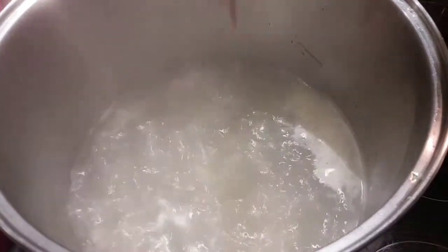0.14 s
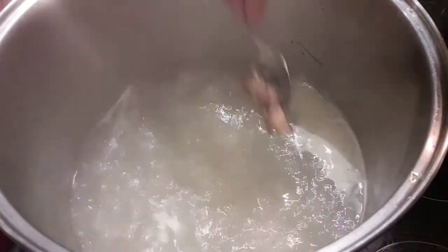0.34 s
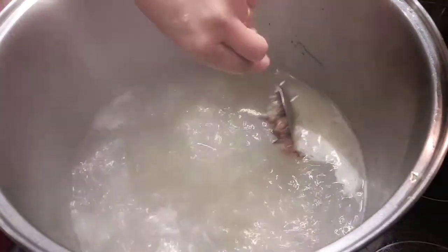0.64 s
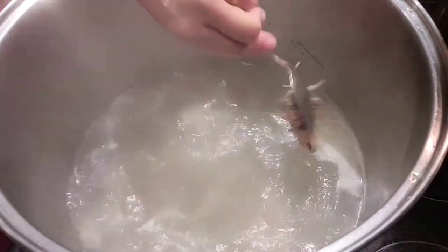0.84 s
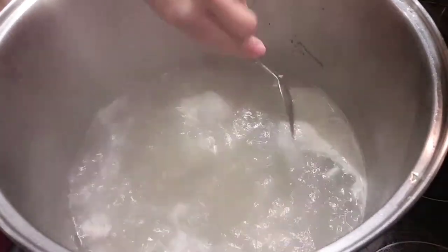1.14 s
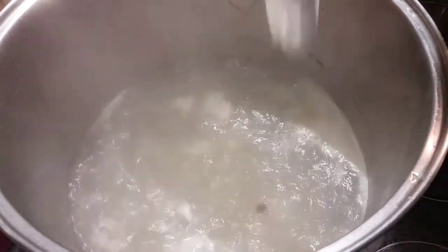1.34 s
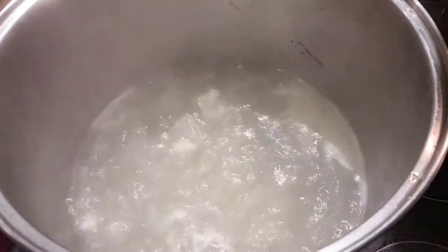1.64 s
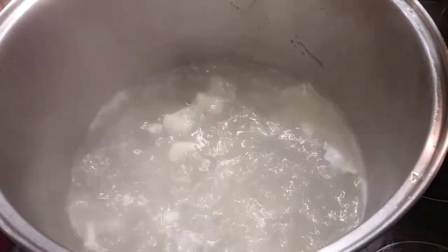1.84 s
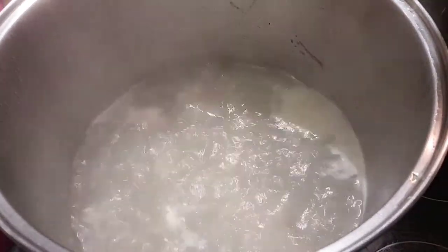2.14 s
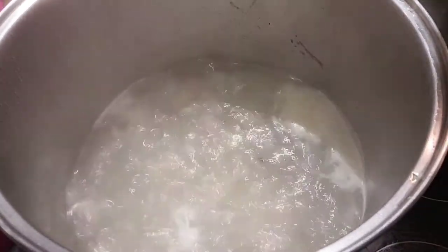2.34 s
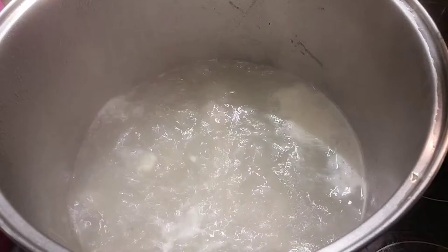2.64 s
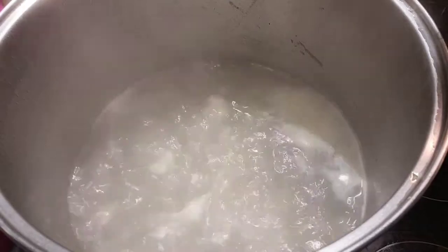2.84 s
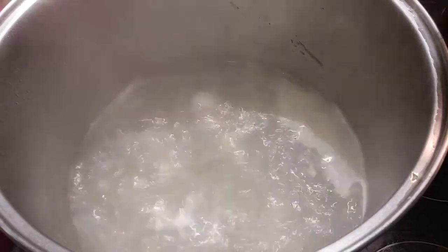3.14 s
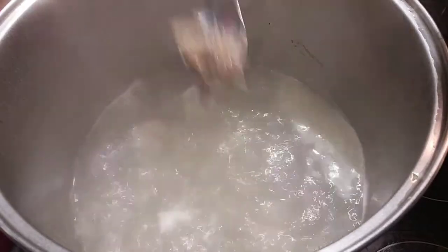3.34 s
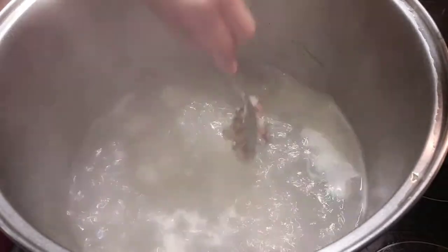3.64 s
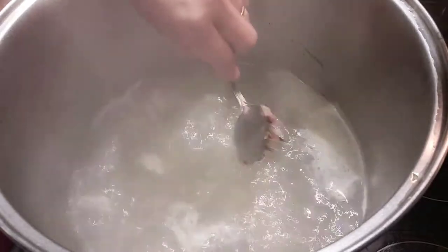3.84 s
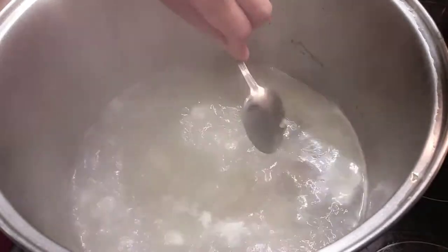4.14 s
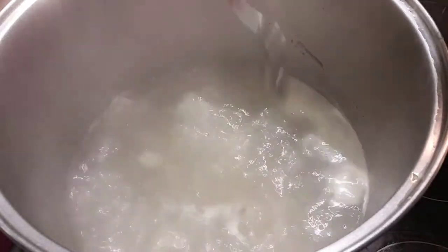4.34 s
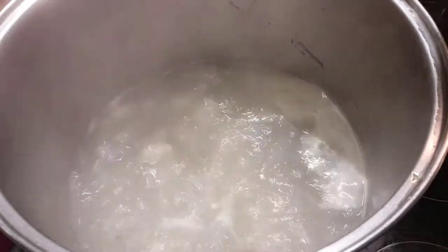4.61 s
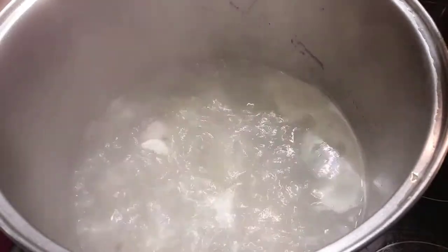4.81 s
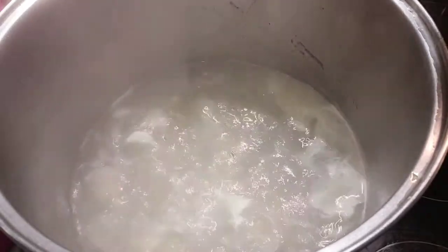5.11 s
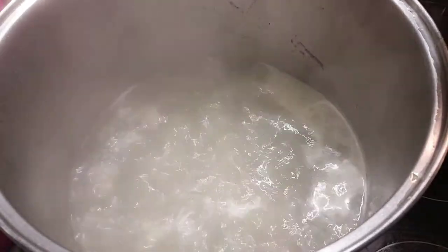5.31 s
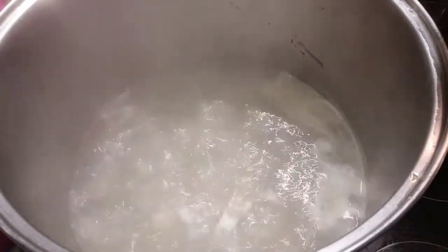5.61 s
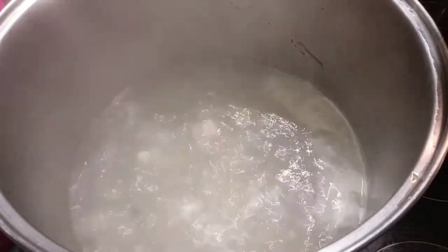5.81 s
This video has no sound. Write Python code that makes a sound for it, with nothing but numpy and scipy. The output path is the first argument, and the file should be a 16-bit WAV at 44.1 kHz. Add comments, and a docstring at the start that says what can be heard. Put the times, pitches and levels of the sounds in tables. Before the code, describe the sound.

A large open steel pot boils hard on a kitchen stove, heard from close above. Hollow, low-mid glugs tumble irregularly over steady simmer, airy pot hum, fizz and tiny bright pops. A spoon clinks sharply around 1.3 seconds with a small splash; duller knocks follow, the strongest near 4.4 seconds with more splashing. Low stove hum lies underneath. Only the right channel carries the scene; the left has faint hiss.

```python
"""A large open steel pot at a rolling boil on an electric stove, heard from close above.
Swelling, rising tones make the steam bubbles glug, fizz and pop; air in the pot hums along and the stove hums low.
Noise makes the simmer, rumble and splashes; ringing tones make a spoon clink and tap a dish nearby.
The microphone feeds only the right input; the open left input carries circuit hiss and a thin whine.
Levels in the scene are those before the input gain and the echo of the kitchen."""
import sys
import numpy as np
from scipy import signal
from scipy.io import wavfile

SR = 44100
rng = np.random.default_rng(int(sys.argv[2]) if len(sys.argv) > 2 else 0)


def to_wav(sig):
    """Store sig (one row per channel, or 1-D mono) as 16-bit WAV at the path in sys.argv[1].

    Samples outside -1..1 are clipped; the rate is SR.
    """
    pcm = np.clip(np.atleast_2d(sig), -1, 1) * 32767
    pcm = np.round(pcm).astype(np.int16)
    wavfile.write(sys.argv[1], SR, pcm.T)  # frames by channels


N = 263277


def from_db(db):
    """Turn decibels into a plain factor."""
    return 10 ** (np.asarray(db) / 20)


def rms_one(x):
    """Scale a sound to an average strength (rms) of 1."""
    return x / np.sqrt(np.mean(x ** 2) + 1e-20)


def in_time(rows):
    """Draw straight lines between the rows of a table, one curve per column after the time."""
    s, *columns = np.transpose(rows)
    return [np.interp(np.arange(N) / SR, s, c) for c in columns]


def drift(rate):
    """Slow chance: noise at every 20th sample, smoothed twice; its rms is 1."""
    r = np.exp(-40 * np.pi * rate / SR)
    noise = rng.standard_normal(N // 20 + 4002)
    slow = signal.lfilter([1], [1, -2 * r, r * r], noise)[4000:]   # skip the filter's start
    return np.interp(np.arange(N) / 20, np.arange(len(slow)), rms_one(slow))


def resonance(x, hz, width_hz):
    """Ring at one pitch, as a hollow does, with gain 1 at the top."""
    r = np.exp(-np.pi * width_hz / SR)
    top = np.array([1, 0, -1]) * (1 - r * r) / 2
    return signal.lfilter(top, [1, -2 * r * np.cos(2 * np.pi * hz / SR), r * r], x)


def band(x, low_hz, high_hz):
    """Keep mainly what lies between two pitches."""
    sos = signal.butter(2, [low_hz, min(high_hz, .45 * SR)], "band", fs=SR, output="sos")
    return signal.sosfilt(sos, x)


def bubbles(s, db, hz, length_s, rise, size, order=2):
    """Each bubble swells, dies a little slower and climbs in pitch; s marks its loudest moment."""
    peak_s = length_s[:, None] * np.sqrt(order) / 2.4   # time from start to loudest moment
    t = np.arange(size) / SR
    u = t / peak_s
    # hz is the pitch at the loudest moment; the start of the swing is left to chance
    turns = hz[:, None] * (t + rise * peak_s * (u - 1) ** 2 / 2) + rng.random((len(s), 1))
    swell = (u * np.exp(1 - u)) ** order
    waves = from_db(db)[:, None] * swell * np.sin(2 * np.pi * turns)
    at = np.round((s[:, None] - peak_s) * SR).astype(int) + np.arange(size)
    at = np.where((at < 0) | (at > N), N, at)   # what falls outside goes to a spare place
    return np.bincount(at.ravel(), waves.ravel(), N + 1)[:N]


def swarm(per_s, low_hz, high_hz, cycles, spread_db, clump_db, clump_rate, size, rise=0.092):
    """Random bubbles in clumps, pitches spread between two limits; rms 1."""
    crowding = from_db(clump_db * np.clip(drift(clump_rate), -2, 1.6))
    s = np.flatnonzero(rng.random(N) < per_s * crowding / SR) / SR
    chance = rng.random((len(s), 2))
    hz = low_hz * (high_hz / low_hz) ** chance[:, 0]
    db = -spread_db * np.log(chance[:, 1] + 0.053)
    return rms_one(bubbles(s, db, hz, cycles / hz, rise, size))


def glugs(churn_db):
    """Large bubbles over a churn of lesser ones, all ringing the space inside the pot."""
    # large steam bubbles breaking, at the peak of the main voice: t/s, level/dB, f/Hz
    large_table = [(0.002, -23, 388), (0.0521, -19, 358), (0.078, -18.5, 328), (0.0927, -17.5, 356),
                   (0.214, -24, 360), (0.2569, -12.5, 347), (0.2675, -7.5, 330), (0.294, -19, 344),
                   (0.302, -22.5, 366), (0.3105, -22.0, 373), (0.379, -18.0, 323), (0.4395, -21.5, 410),
                   (0.5617, -21.5, 375), (0.596, -20, 386), (0.6898, -21, 376), (0.698, -20.5, 380),
                   (0.8035, -18, 326), (0.8106, -12, 356), (0.8231, -17.5, 360), (0.9795, -20.5, 376),
                   (1.0294, -20.5, 342), (1.0788, -20.5, 379), (1.0876, -21.5, 340), (1.1223, -16.5, 396),
                   (1.2008, -20.5, 386), (1.3362, -20.5, 430), (1.3495, -19, 370), (1.3697, -23, 358),
                   (1.4761, -25.5, 332), (1.5928, -16.5, 334), (1.7424, -16, 326), (1.7516, -15, 370),
                   (1.802, -20, 343), (1.826, -23, 357), (1.8377, -22.0, 364), (1.855, -7.5, 360),
                   (1.874, -9.5, 412), (1.9006, -24, 350), (1.9476, -24, 366), (1.9584, -19, 380),
                   (1.9734, -20, 390), (1.9839, -25, 370), (2.0572, -17, 402), (2.0688, -22.5, 385),
                   (2.191, -12.5, 353), (2.2107, -26, 331), (2.2198, -24, 350), (2.285, -20.0, 385),
                   (2.4766, -27, 363), (2.5256, -17.0, 316), (2.556, -20.5, 354), (2.6099, -21, 400),
                   (2.6518, -19.5, 365), (2.7319, -20, 317), (2.7406, -23, 365), (3.019, -20, 380),
                   (3.0279, -25, 367), (3.1118, -19, 360), (3.1817, -19, 348), (3.4307, -19.5, 376),
                   (3.4464, -16.5, 348), (3.5286, -13, 360), (3.5447, -16.0, 363), (3.5542, -20.5, 377),
                   (3.7641, -20.5, 360), (3.9698, -24, 380), (3.993, -23.5, 342), (4.0403, -19.5, 388),
                   (4.0863, -25.5, 347), (4.134, -23, 393), (4.1955, -19.0, 306), (4.2381, -20, 340),
                   (4.2577, -22.0, 292), (4.3254, -19.5, 392), (4.4045, -20.5, 403), (4.4178, -16, 365),
                   (4.449, -20.0, 379), (4.4561, -12, 380), (4.47, -8, 328), (4.4848, -16.5, 382),
                   (4.506, -24, 354), (4.5194, -16, 410), (4.5404, -28, 372), (4.6264, -13.0, 385),
                   (4.6403, -19, 377), (4.6699, -26, 350), (4.682, -26, 363), (4.785, -26, 391),
                   (4.8786, -20, 375), (4.9701, -20.5, 406), (5.2918, -22, 342), (5.4657, -21, 338),
                   (5.4756, -28, 380), (5.4882, -17.5, 339), (5.5131, -22.0, 382), (5.614, -20.0, 342),
                   (5.6342, -20, 382), (5.7546, -19.5, 340), (5.8048, -22, 382), (5.8498, -23, 373),
                   (5.862, -25, 350), (5.8976, -17, 397), (5.9223, -16, 356), (5.934, -33, 360),
                   (5.9618, -13, 382)]
    # ringing of air and broth in the pot: f/Hz, width/Hz, level/dB
    pot_tones = [(323.2, 20, -3), (400.3, 20.7, 5), (434, 29, -10), (635, 27, -6.5)]
    cycles = 1.942   # sets a glug's length in swings of its main pitch

    def ringing(x):
        return sum(from_db(g) * resonance(x, f, w) for f, w, g in pot_tones)

    s, db, hz = np.transpose(large_table)
    length_s = cycles / hz
    large = bubbles(s, db, hz, length_s, 0.16, size=2600, order=5)
    # a weaker upper voice and a dull lower push
    large += bubbles(s, db - 23, 1.723 * hz, length_s, 0.055, size=2600, order=5)
    large += bubbles(s, db - 13.5, 0.543 * hz, length_s, 0.044, size=2600, order=5)
    churn = swarm(170, 206.0, 551, 1.673, spread_db=2.0, clump_db=3, clump_rate=9, size=1500)
    ringing_churn = rms_one(churn + 2.73 * ringing(churn))
    return large + 0.15 * ringing(large) + from_db(churn_db) * ringing_churn


def simmer():
    """Steady simmer and steam: half-octave bands of noise, each flickering a little, partly together."""
    # balance of low and high, against one another: f/Hz, level per Hz/dB
    balance = [(82, -32), (140, -15), (215, -7.5), (406, 2.5), (556, -26), (718, -13), (874, -25),
               (1040, -7), (2040, -31.5), (2790, -20), (3750, -29.5), (5570, -28), (9000, -40),
               (15500, -44.5)]
    simmer_db = -40.5   # rms of all bands together, before the boil's swing
    hz, db = np.transpose(balance)
    out, together = 0, drift(1.4)
    edges = 140 * 2 ** np.arange(0, 7.1, .5)
    white = rng.standard_normal((2, N))   # neighbouring bands take turns between two noises
    for k, (low, high) in enumerate(zip(edges, edges[1:])):
        level = np.interp(np.log(low * high) / 2, np.log(hz), db)
        flicker_db = 0.81 * together + 0.9 * drift(8.1)
        out = out + from_db(level + flicker_db) * band(white[k % 2], low, high)
    return from_db(simmer_db) * rms_one(out)


def stove(swing_db):
    """Mains hum at twice the line rate, wavering, over the low rumble and thumps of the heaving broth."""
    # the broth heaves with a dull thump, at its peak: t/s, level/dB
    heave_table = [(0.121, -27), (0.185, -34), (0.289, -27), (1.92, -38), (1.992, -25.5), (2.029, -31),
                   (2.338, -48), (2.849, -28), (3.367, -33.5), (3.527, -31), (4.265, -28), (4.52, -30),
                   (4.609, -30), (4.966, -29), (5.935, -36)]
    hum_hz, hum_db = 120, -35.5
    rumble_db, rumble_follows = -40.5, 0.78   # level at mean vigour; share of the boil's swing
    heave_hz, heave_s = 70.7, 0.0389   # pitch; setting for the length of a thump
    hum = from_db(hum_db + 1.5 * drift(7.9)) * np.sin(2 * np.pi * hum_hz * np.arange(N) / SR)
    white = rng.standard_normal((2, N))
    low_noise = rms_one(band(band(white[0], 49.0, 89.3), 7.6, 130))
    rumble = from_db(rumble_db + rumble_follows * swing_db) * low_noise
    steady = from_db(-39.5) * rms_one(band(white[1], 95.3, 148.7))
    s, db = np.transpose(heave_table)
    heaves = bubbles(s, db, np.full(len(s), heave_hz), np.full(len(s), heave_s), .0, size=6000)
    return hum + rumble + heaves + steady


def fizz(fizz_db, patter_db):
    """Tiny bubbles burst in clumps of like size: a dense spray, a bright crackle and a lower patter."""
    # sizes of tiny bubbles, heard as pitch: f/Hz, level against one another/dB
    sizes = [(4400, -10), (5600, -10), (7200, -20.5)]
    crackle_db = -63.5   # before the quick surges
    spray = 0
    for hz, db in sizes:
        one_size = swarm(700, hz / 1.127, hz * 1.175, 4.0, spread_db=4.0, clump_db=4.0, clump_rate=14, size=160)
        spray = spray + from_db(db) * one_size
    crackle = swarm(2600, 8400, 15000, 5.5, spread_db=5.5, clump_db=6, clump_rate=19, size=110)
    patter = swarm(500, 928, 3290, 3.5, spread_db=-0.5, clump_db=3, clump_rate=20, size=400)
    return from_db(fizz_db) * spray + from_db(crackle_db) * crackle + from_db(patter_db) * patter


def blips():
    """Mid-size bubbles that chirp upward as they reach the surface."""
    blips_db = -50   # before the quick surges
    chirps = swarm(90, 512, 1115, 5.04, spread_db=2.0, clump_db=3.0, clump_rate=10, size=1200, rise=0.14)
    return from_db(blips_db) * chirps


def pot_air(level_db):
    """Bubbles keep the air in the pot humming, its pitch wandering; short flares stand out above the hum."""
    # flares near the pitch of the hum, at their peak: t/s, level/dB, f/Hz
    flare_table = [(0.0331, -37, 863), (0.1162, -30, 877), (0.2171, -28, 890), (0.2646, -30, 850),
                   (0.3072, -32.0, 856), (0.4248, -29, 870), (0.4406, -31, 886), (0.5667, -28, 860),
                   (0.5968, -27.5, 880), (0.6986, -26.5, 853), (0.768, -32.0, 897), (0.8233, -26.5, 863),
                   (0.8642, -37, 866), (1.2174, -32.5, 855), (1.2657, -34, 887), (1.2877, -34, 840),
                   (1.3146, -26.5, 863), (1.3403, -24.0, 870), (1.3882, -28.5, 860), (1.5927, -24.5, 891),
                   (1.7137, -30, 880), (1.795, -31.5, 870), (1.8916, -27, 893), (1.9903, -24, 912),
                   (2.048, -34, 914), (2.1123, -32.5, 861), (2.1619, -34.5, 864), (2.2468, -36, 885),
                   (2.4441, -26, 894), (2.4763, -34.0, 866), (2.6375, -28.5, 910), (2.6845, -32.5, 900),
                   (2.7986, -35, 909), (2.9317, -35, 881), (2.9583, -31, 847), (3.0054, -33, 860),
                   (3.0284, -32.0, 920), (3.262, -31, 900), (3.3205, -37, 920), (3.4359, -31.5, 844),
                   (3.546, -33, 908), (3.748, -24, 885), (3.941, -32, 850), (4.0399, -28.5, 863),
                   (4.1541, -31.0, 860), (4.2004, -35, 865), (4.4167, -36, 863), (4.4702, -23, 847),
                   (4.5088, -35, 884), (4.6715, -33, 870), (4.7572, -33, 857), (4.8322, -36, 913),
                   (5.0076, -32, 855), (5.0712, -29.5, 884), (5.3902, -39, 860), (5.6006, -32.0, 884),
                   (5.6343, -33, 873), (5.83, -32, 892), (5.9094, -32.5, 894), (5.9526, -35, 854)]
    air_hz, width_hz, flare_s = 866.6, 37, 0.0111   # hum pitch and width; setting for a flare's length
    wander, wander_rate = 0.0098, 9.4   # slow random wander of the hum: share of pitch, per s
    s, db, hz = np.transpose(flare_table)
    flares = bubbles(s, db, hz, np.full(len(s), flare_s), .0, size=2400, order=2)
    pushes = swarm(300, 753, 1060, 2.62, spread_db=3.5, clump_db=3.0, clump_rate=12, size=500)
    pitch_hz = air_hz * (1 + wander * drift(wander_rate))
    # a resonance that follows the pitch: shift it down to zero, smooth, shift it back
    spin = np.exp(2j * np.pi * np.cumsum(pitch_hz) / SR)
    r = np.exp(-np.pi * width_hz / SR)
    hum = np.real(spin * signal.lfilter([1 - r], [1, -r], pushes / spin))
    return flares + from_db(level_db) * rms_one(hum)


def pops():
    """Small bubbles pop at the surface, each amid eight weaker ones at nearby pitches; big pops ring longer."""
    # the clearest small bubbles popping, at their peak: t/s, level/dB, f/Hz
    clear_table = [(0.086, -29, 7350), (0.135, -33, 4800), (0.19, -29, 5100), (0.241, -34, 1500),
                   (0.249, -31, 4940), (0.267, -39, 1840), (0.3916, -34.5, 1630), (0.317, -32, 4500),
                   (0.404, -30.5, 5440), (0.552, -30.5, 5400), (0.652, -29, 5400), (0.71, -29, 5700),
                   (0.825, -31.5, 5800), (1.11, -28, 5800), (1.153, -30, 5240), (1.1555, -34, 2390),
                   (1.284, -28.5, 5700), (1.323, -43, 4540), (1.5196, -38, 1460), (1.5895, -38, 1590),
                   (1.848, -31.5, 5850), (2.08, -29, 6040), (2.357, -32, 4840), (2.411, -29.5, 7200),
                   (2.423, -32, 8400), (2.434, -32, 4130), (2.442, -34, 2560), (2.539, -30, 5600),
                   (2.587, -31, 6240), (2.65, -32, 6330), (2.6787, -38, 1560), (2.701, -32, 4400),
                   (2.7113, -36, 1575), (2.7437, -20, 3840), (2.747, -41, 4670), (2.914, -28, 4840),
                   (3.005, -33, 8150), (3.062, -36.5, 1430), (3.1, -36, 6240), (3.169, -30, 6130),
                   (3.247, -32, 5400), (3.395, -27.5, 5330), (3.479, -33, 7400), (3.647, -28, 5700),
                   (3.7428, -36.5, 2040), (3.891, -31, 5750), (4.045, -34, 7800), (4.0748, -37, 1450),
                   (4.2, -38.5, 1460), (4.222, -32, 5750), (4.346, -26, 6380), (4.592, -28.5, 5800),
                   (4.613, -28.5, 5360), (4.708, -29, 5830), (4.802, -35, 5100), (4.863, -37, 3300),
                   (5.02, -33.5, 5940), (5.032, -33, 5960), (5.162, -31, 5600), (5.183, -31.5, 5570),
                   (5.265, -29, 6200), (5.362, -30.5, 6550), (5.399, -33, 5140), (5.539, -37.5, 1770),
                   (5.554, -26.5, 5200), (5.773, -32.5, 5100)]
    usual_db = -27.5   # strongest of the ordinary pops
    lesser_count, lesser_db, lesser_spread_db = 260, -38, 5.5   # pops at random moments: mean peak, spread
    low_hz, high_hz = 4065, 9230   # pitch limits of the lesser pops
    when, strength, pitch = rng.random((lesser_count, 3)).T
    random_db = lesser_db + lesser_spread_db * (2 * strength - 1)
    lesser = [when * N / SR, random_db, low_hz * (high_hz / low_hz) ** pitch]
    s, db, hz = np.hstack([np.transpose(clear_table), lesser])
    cycles = 3.5 + 0.22 * np.maximum(db - usual_db, 0)
    first = bubbles(s, db, hz, cycles / hz, 0.025, size=400)

    chance = rng.random((len(s), 3, 8))
    near_s = s[:, None] - 0.004 - 0.0066 * np.log(chance[:, 0] + 0.019)   # just before or after
    near_hz = (hz[:, None] * 1.6 ** (chance[:, 1] - .5)).ravel()
    weaker_db = np.minimum(db, usual_db)[:, None] - 6.0 - 6 * chance[:, 2]
    return first + bubbles(near_s.ravel(), weaker_db.ravel(), near_hz, 4.8 / near_hz, 0.16, size=300)


def strike(blows, modes, crack_db, crack_t60, low_hz, high_hz):
    """Each blow strikes every mode (ringing tone); a hard one is quick, reaches upper modes and cracks."""
    out, t = np.zeros(N), np.arange(SR // 5) / SR
    for s, db, hardness, free in blows:
        contact = 1 - np.exp(-t / (.0002 * from_db(-1.4 * hardness)))   # hard blows set in faster
        crack = rms_one(band(rng.standard_normal(len(t)), low_hz, high_hz))
        tap = from_db(crack_db + .4 * hardness - 60 * t / (free * crack_t60)) * crack
        for hz, mode_db, t60 in modes:
            strength = mode_db + hardness * np.log2(hz / modes[0][0]) + rng.normal()
            tap += from_db(strength - 60 * t / (free * t60)) * np.sin(2 * np.pi * hz * t)
        i = round(s * SR)
        out[i:i + len(t)] += from_db(db) * contact * tap
    return out


def spoon():
    """The spoon clinks on its own as it is shaken clean, and knocks on the dish."""
    # blows on the spoon, then on the dish: t/s, level/dB, hardness/dB per octave, share of free ring time
    clinks = [(1.2222, -43, 3, 0.3), (1.2277, -32, 4.5, .25), (1.2383, -30, -1, 0.53),
              (1.2455, -42, -3, .5), (1.2826, -36, -4, .5), (1.3075, -43, -6, .4), (1.3371, -17, 3, .4),
              (1.3387, -20.5, 2, 0.46), (1.343, -25.5, 4, 0.56), (1.347, -33, -11, .8)]
    taps = [(1.263, -29, -12, 0.53), (1.7, -29.5, -11, .45), (1.745, -28, -11, .48),
            (1.804, -28, -11, 0.71), (1.886, -34, -4, .48), (2.071, -31, -3.5, .5), (2.4732, -20, 3, 1.24),
            (2.486, -36, -11, .6), (2.7952, -23, -12, 0.73), (4.3849, -14, -11, 0.31),
            (4.411, -32, -8, 0.26), (5.004, -27, -16, 0.34)]
    # modes of each, ringing freely: f/Hz, level against the blow/dB, time to fall by 60 dB/s
    spoon_modes = [(2430, -6.5, 0.018), (2940, -8, 0.031), (3810, -4.5, 0.033), (4716, -2, 0.033),
                   (5580, 1.5, 0.02), (5920, -4, 0.029), (7340, -15, 0.03), (8630, -21, 0.028),
                   (10260, -15, .03), (11500, -15, .03), (12660, -20, .02)]
    dish_modes = [(1356, 0.5, 0.069), (1730, -8, 0.022), (1800, -5.5, 0.046), (2360, 2.5, 0.021),
                  (2700, 1, 0.0068), (3245, -3, 0.049), (3550, -19, 0.018), (4440, -15, 0.065),
                  (5680, -17.5, 0.047)]
    spoon_crack_db, dish_crack_db = -10, -6   # contact noise against the blow, at hardness 0
    on_spoon = strike(clinks, spoon_modes, spoon_crack_db, 0.04, 1200, 11000)
    return on_spoon + strike(taps, dish_modes, dish_crack_db, 0.035, 810, 3900)


def splashes():
    """Splashes and spits: showers of droplets, made of noise, that start at once and die away."""
    # t/s, starting rms level/dB, centre f/Hz, width/octaves, time to fall by 60 dB/s
    splash_table = [(1.237, -31.5, 5000, 2, 0.045), (1.243, -41, 3950, 1.7, 0.25),
                    (1.308, -36, 3580, 1.4, 0.18), (1.31, -31, 2100, 0.64, .02),
                    (1.338, -25, 1300, 1.6, 0.026), (1.34, -39, 4800, 1.9, 0.11),
                    (2.7422, -24, 3770, 0.74, 0.011), (2.744, -41, 4400, 1.1, 0.24),
                    (4.2712, -31, 2500, 0.38, 0.017), (4.27, -37, 1890, 1.6, 0.19),
                    (4.272, -37, 5900, 0.96, 0.11), (4.367, -35, 1330, 1.8, .05),
                    (4.385, -29.5, 1700, 0.61, .065), (4.398, -30.5, 4740, 0.61, 0.028),
                    (4.409, -32, 1580, 0.81, 0.042), (4.416, -42, 1740, 1, 0.033),
                    (4.597, -34, 2080, 1, 0.035), (4.885, -33.5, 2220, 0.85, 0.034),
                    (4.9, -38, 4030, 0.54, 0.018), (4.953, -29, 2140, 1.9, 0.018)]
    drops_per_s = 2900   # stronger grains within the noise
    out, t = np.zeros(N), np.arange(SR // 4) / SR
    for s, db, hz, octaves, t60 in splash_table:
        low_hz, high_hz = hz / 2 ** (octaves / 2), hz * 2 ** (octaves / 2)
        grains = 0.12 + (rng.random(len(t)) < drops_per_s / SR)
        drops = rng.standard_normal(len(t)) * grains
        burst = band(band(drops, low_hz, high_hz), low_hz / 1.9, high_hz * 1.37)
        i = round(s * SR)
        out[i:i + len(t)] += from_db(db - 60 * t / t60) * rms_one(burst)
    return out


def kitchen(x):
    """A short blurred echo of fading noise that starts after the first walls answer."""
    t60_s = 0.14   # time to fall by 60 dB
    t = np.arange(SR // 3) / SR
    tail = from_db(-60 * t / t60_s) * rng.standard_normal(len(t)) * (t > .004)
    return signal.fftconvolve(x, tail / np.sqrt(np.sum(tail ** 2)))[:N]


def scene():
    """One microphone on the right side; the boil's vigour drives churn, hum of the air, simmer and rumble."""
    # vigour of the boil, as the rms level of its churn: t/s, level/dB
    boil = [(0.0, -27.5), (0.11, -33), (0.56, -35), (0.78, -36.5), (0.9, -37), (1.58, -33), (1.96, -32),
            (2.21, -36.5), (3.03, -33.5), (3.41, -36), (4.31, -31), (4.79, -33.5), (5.05, -35), (5.4, -34),
            (5.64, -34.5), (5.97, -31)]
    # fizz and patter have their own curves, before quick surges: t/s, fizz level/dB, patter level/dB
    surface = [(0.0, -43.5, -47.5), (0.86, -47.5, -50.5), (1.76, -45, -48.5), (2.24, -45, -51),
               (2.53, -45, -45), (3.06, -48, -53.5), (4.47, -43.5, -47.5), (4.62, -52, -51.5),
               (5.65, -44.5, -52), (5.97, -45.5, -48.5)]
    air_mean_db, air_follows, air_waver_db = -44, 0.2, 0.5   # hum; share of the boil's swing; own waver
    simmer_follows, surge_db, kitchen_db = 0.085, 2.28, -10.5   # share of swing; surges; echo level
    churn_db, = in_time(boil)
    swing_db = churn_db - churn_db.mean()
    air_db = air_mean_db + air_follows * swing_db + air_waver_db * drift(11.0)
    surges = from_db(surge_db * np.clip(drift(5.8), -2, 2))   # shared by blips and fizz
    small = surges * (blips() + fizz(*in_time(surface)))
    near = glugs(churn_db) + pot_air(air_db) + small + pops() + splashes() + spoon()
    steady = from_db(simmer_follows * swing_db) * simmer() + stove(swing_db)
    mic = near + from_db(kitchen_db) * kitchen(near) + steady
    return np.array([np.zeros(N), mic])


def record(dry):
    """Input gain with rounded peaks, circuit hiss and a clock whine on both inputs, then the top is cut."""
    gain_db, ceiling, cutoff_hz = 6, .97, 15850
    whine_hz, whine_db, hiss_db = 400, -92, -73.5   # the whine holds multiples 2 to 8 of its base pitch
    t = np.arange(N) / SR
    whine = sum(np.sin(2 * np.pi * k * whine_hz * t) / np.sqrt(k) for k in range(2, 9))
    white = rng.standard_normal((2, N))
    no_bass = signal.butter(2, 45, "high", fs=SR, output="sos")
    hiss = signal.sosfilt(no_bass, white + .8 * band(white, 40, 200))
    loud = from_db(gain_db) * dry
    rounded = loud / (1 + (loud / ceiling) ** 6) ** (1 / 6)
    wired = rounded + from_db(hiss_db) * hiss + from_db(whine_db) * whine
    return signal.sosfilt(signal.ellip(12, .3, 70, cutoff_hz, fs=SR, output="sos"), wired)


dry = scene()
out = record(dry)
to_wav(out)
```